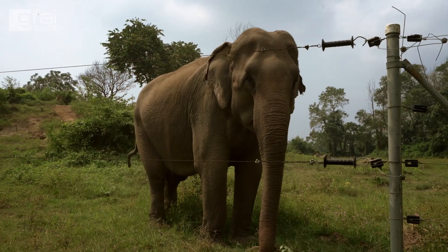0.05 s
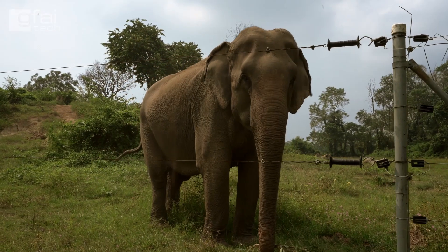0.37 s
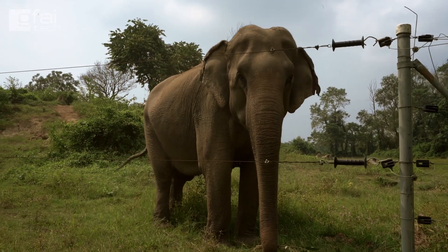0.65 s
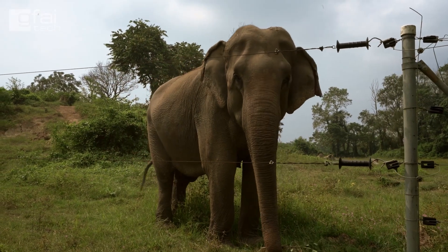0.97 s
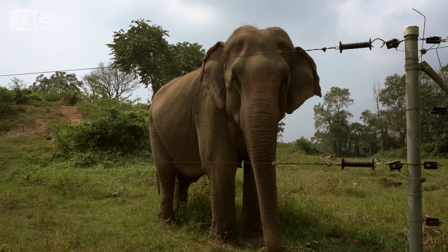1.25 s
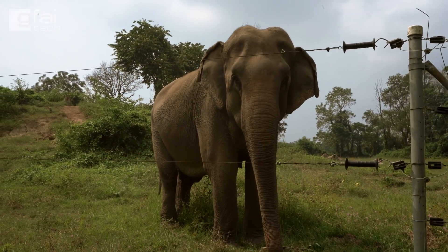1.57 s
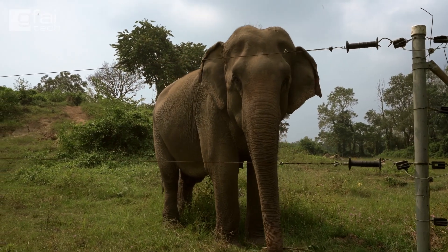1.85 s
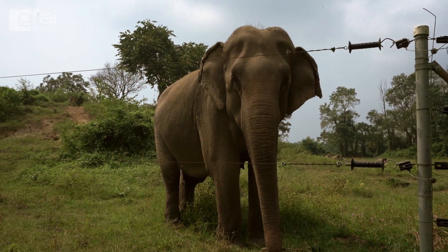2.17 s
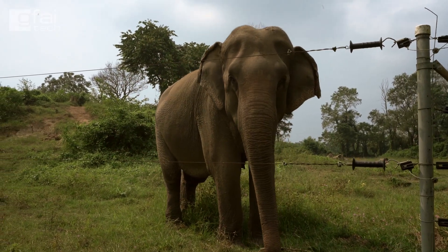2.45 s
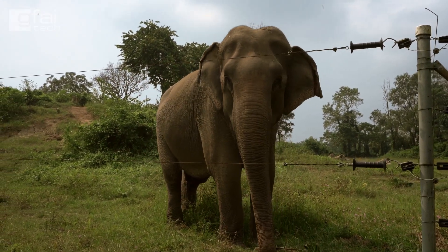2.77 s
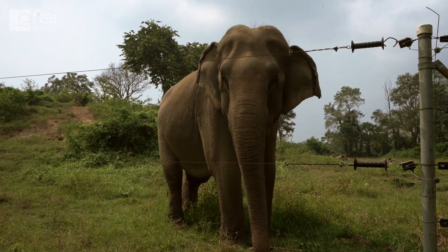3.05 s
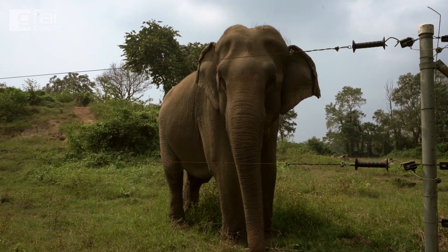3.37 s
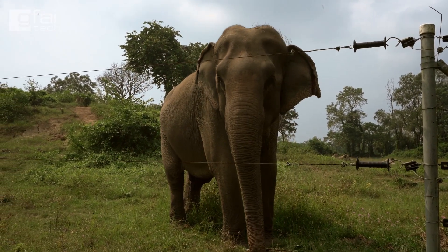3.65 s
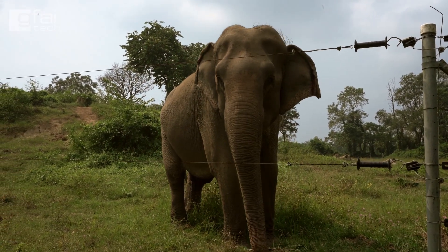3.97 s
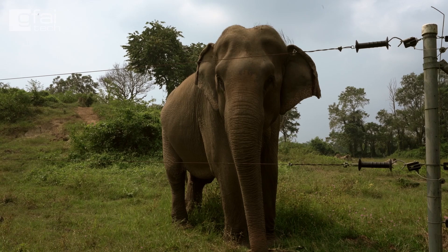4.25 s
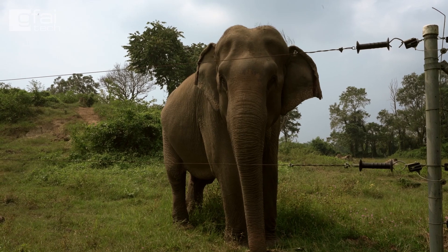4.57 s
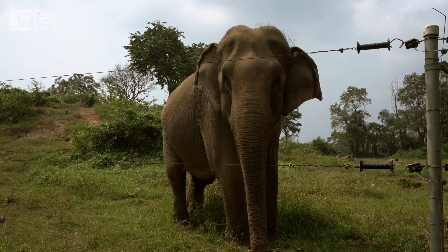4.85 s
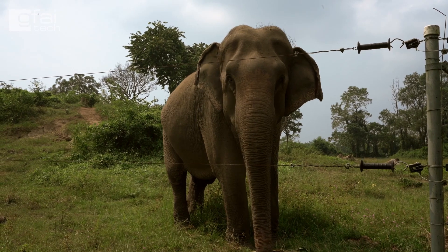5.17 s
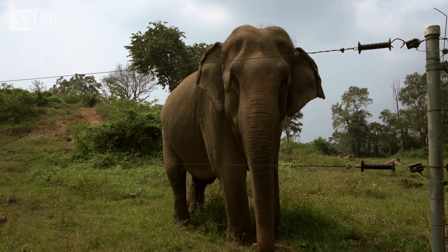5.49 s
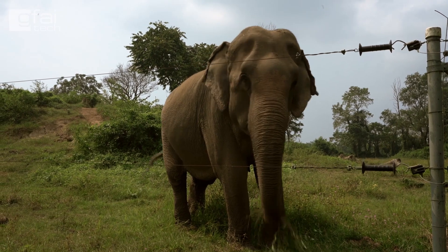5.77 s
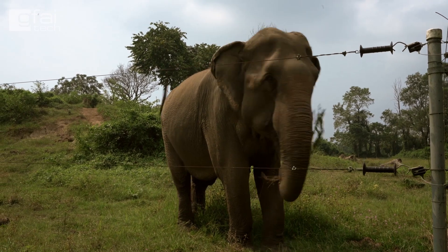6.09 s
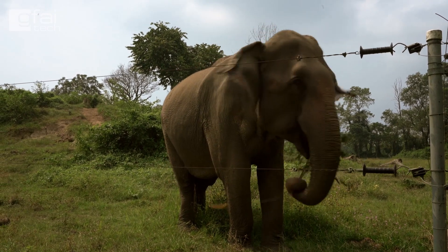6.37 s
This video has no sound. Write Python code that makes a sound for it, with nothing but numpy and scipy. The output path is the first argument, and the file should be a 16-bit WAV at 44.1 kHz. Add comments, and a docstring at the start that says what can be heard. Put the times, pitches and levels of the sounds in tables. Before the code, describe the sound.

A close elephant breaks into a deep, pulsing, raspy rumble after several seconds of gusty wind and soft chirping in a meadow.

```python
"""Wind buffets the microphone in an open meadow, where insects sing, small birds chirp and stalks tick.
Near the end, an elephant close by starts a loud, throbbing rumble: slow vocal-fold pulses
ring its long throat and trunk, and a rasping puff of air follows each pulse.
A steady, crackly hiss and rustle is heard during the call."""
import sys
import numpy as np
from scipy import signal
from scipy.fft import rfft, irfft, next_fast_len
from scipy.io import wavfile
from scipy.ndimage import uniform_filter1d

SR = 44100
rng = np.random.default_rng(int(sys.argv[2]) if len(sys.argv) > 2 else 0)


def put_to_file(sound):
    """Save the sound as 16-bit audio at rate SR, in the file named by the first command-line argument."""
    columns = np.atleast_2d(sound).T  # one column per channel
    safe = np.clip(columns, -1, 1)
    whole_steps = np.round(safe * 32767)
    wavfile.write(sys.argv[1], SR, whole_steps.astype(np.int16))


N = 291942
TIME = np.arange(N) / SR


def from_db(db):
    """Decibels to gain."""
    return 10 ** (np.asarray(db) / 20)


def rms_one(x):
    """Scale to unit power."""
    return x / np.sqrt(np.mean(x ** 2) + 1e-20)


def automation(rows):
    """One curve per column, drawn through breakpoints whose first column is time."""
    times, *columns = np.transpose(rows)
    return [np.interp(TIME, times, column) for column in columns]


def at_hz(points, hz):
    """Read a curve on a log-frequency axis."""
    freqs, values = np.transpose(points)
    return np.interp(np.log(hz), np.log(freqs), values)


def swells(rows, steepness=1):
    """Power of rounded swells (peak s, dB, length s) that rise steepness times faster than they fall."""
    power = np.zeros(N)
    for peak, db, length in rows:
        near = slice(*np.searchsorted(TIME, [peak - 2 * length, peak + 2 * length]))
        offset = 2 * (TIME[near] - peak) / length
        power[near] += from_db(db) ** 2 * np.exp(-np.where(offset < 0, steepness * offset, offset) ** 2)
    return power


def drift(rate):
    """Random modulation that glides to a new value rate times a second."""
    knots = rng.standard_normal(N // 20)
    return np.interp(TIME * rate, np.arange(len(knots)), knots)


def ring(clicks, hz, t60):
    """A unit click sets a sine of height 1 ringing."""
    r, w = from_db(-60 / (t60 * SR)), 2 * np.pi * hz / SR
    return signal.lfilter([0, np.sin(w)], [1, -2 * r * np.cos(w), r * r], clicks + 1e-18)


def noise_band(hz, width_hz, passes=1, shape=(2, N)):
    """White noise sent through a resonance one or more times; rms 1."""
    r, w = np.exp(-np.pi * width_hz / SR), 2 * np.pi * hz / SR
    band = rng.standard_normal(shape)
    for _ in range(passes):
        band = signal.lfilter([1, 0, -1], [1, -2 * r * np.cos(w), r * r], band)
    return rms_one(band)


# Outdoor stereo image, wider towards the top. Each row: frequency in Hz, left-right correlation.
OUTDOOR_LIKENESS = [(130, 1), (300, 0.45), (3100, 0.39), (15000, 0.08)]

def noise(spectrum, likeness=OUTDOOR_LIKENESS, patchy_db=0):
    """Stereo noise in half-octave bands that follow a spectrum and may each swell on their own; rms 1."""
    low, high = spectrum[0][0], min(spectrum[-1][0], SR * .4)
    edges = np.geomspace(low, high, int(2 * np.log2(high / low)) + 2)
    out, white = 0, rng.standard_normal((2, 2, N))
    for k, band in enumerate(zip(edges, edges[1:])):
        mid, side = signal.sosfilt(signal.butter(2, band, "band", fs=SR, output="sos"), white[k % 2])
        hz = np.sqrt(band[0] * band[1])
        alike = np.clip(at_hz(likeness, hz), -1, 1)
        gain = from_db(at_hz(spectrum, hz) + (patchy_db * drift(35) if patchy_db else 0))
        out = out + gain * (np.sqrt(1 + alike) * mid + np.sqrt(1 - alike) * side * [[1], [-1]])
    return rms_one(out)


def pan(x, left_db):
    """Make the left side louder than the right by left_db."""
    return x * from_db([[left_db / 2], [-left_db / 2]])


def lag_right(left, right, lag_s=0.00077):
    """Sound comes a little later on the right side."""
    return np.array([left, np.interp(TIME - lag_s, TIME, right)])


def scatter(x, t60):
    """Bushes and trees return a thin, dying cloud of echoes, different on each side."""
    age = TIME[:SR]
    echoes = rng.standard_normal((2, SR)) * from_db(-60 * age / t60) * (1 - np.exp(-age / 0.0015))
    return signal.fftconvolve(x[None], echoes / np.sqrt(np.sum(echoes ** 2) / 2), axes=1)[:, :N]


# Tone of the hush. Each row: frequency in Hz, relative level in dB.
HUSH_SPECTRUM = [(60, 11.5), (300, 4.5), (1500, 0.5), (2600, -1.5), (4000, -3), (6500, -2.5), (12000, -6),
                 (15500, -7)]
# Its fader ride. Each row: time in seconds, relative level in dB.
HUSH_RIDE = [(0.0, -57), (3.3, -51), (5.5, -52.5)]

def meadow_hush():
    """A soft, wide bed of noise under everything."""
    ride_db, = automation(HUSH_RIDE)
    return pan(from_db(ride_db + 1.5) * lag_right(*noise(HUSH_SPECTRUM), lag_s=0.00015), -1.84)


# The trill's carrier and wing-beat side tones. Each row: frequency in Hz, relative level in dB.
CRICKET_TONES = [(4880, -1.5), (5010, 1.5), (5150, -0.5), (5290, -1), (5432, 0)]
# The trill's fader ride. Each row: time in seconds, level in dB.
CRICKET_RIDE = [(0, -66.5), (3.7, -56), (4.6, -59.5), (5.5, -55.5)]
# Grasshopper phrases. Each row: start in seconds, length in seconds, centre in Hz, level in dB.
GRASSHOPPER_PHRASES = [(0.514, 0.35, 10360, -64), (1.35, 0.56, 10660, -67.5), (3.048, 0.476, 10760, -59.5),
                       (4.35, 0.54, 10990, -62)]

def insects(wing_hz=140):
    """Far crickets trill, bush crickets sizzle on the left, grasshoppers swell and stop on the right."""
    trill_db, = automation(CRICKET_RIDE)
    trill = rms_one(sum(from_db(db) * noise_band(hz, width_hz=14) for hz, db in CRICKET_TONES))
    sizzle = from_db(-63) * noise_band(15300, width_hz=1300)
    out = from_db(trill_db) * trill + pan(sizzle, 2.5)
    strokes = 1 + 0.55 * np.sin(2 * np.pi * wing_hz * TIME)
    for start, length, hz, db in GRASSHOPPER_PHRASES:
        progress = (TIME - start) / length
        swell = np.clip(2 * progress, 0, 1) * (progress < 1)
        out += from_db(db) * swell * strokes * pan(noise_band(hz, width_hz=750, passes=2), -6.5)
    return out


# A hoarse call. Each row: peak time in seconds, level in dB, length in seconds.
FAR_BIRD_CALLS = [(3.18, -50, 0.069)]

def far_bird():
    """A distant bird's hoarse call arrives as a soft blur."""
    return np.sqrt(swells(FAR_BIRD_CALLS)) * noise_band(1760, width_hz=670, passes=2)


# The notes of each named song. Each row: delay in seconds, length in seconds, loudest moment as a
# share of the length, then evenly spaced pitches as ratios to the bird's pitch.
SONG_NOTES = {"sweep": [(0, 0.072, 1, 0.82, 0.89, 0.94, 0.94, 1.13, 0.69)],
              "slur": [(0, 0.095, 0.42, 1.27, 0.96, 0.8)], "rise": [(0, 0.055, 0.55, 1, 1, 1.2)],
              "two notes": [(0, 0.104, 0.41, 0.903, 1, 0.93), (0.12, 0.045, 0.52, 1.5, 0.97, 0.92)],
              "peep": [(0, 0.038, 0.54, 0.98, 0.99)],
              "flourish": [(0.0036, 0.028, 0.15, 0.98, 0.97, 0.83, 0.75, 0.7),
              (0.028, 0.041, 0.69, 0.7, 0.86, 1.03, 0.99, 1.05, 0.99, 0.97)]}
# Small birds' cues. Each row: start in seconds, song name, pitch in Hz, level in dB.
BIRD_CUES = [(0.137, "slur", 3280, -52), (0.96, "two notes", 2790, -61), (1.39, "sweep", 7700, -57),
             (1.66, "peep", 6600, -55), (2.143, "rise", 3270, -52.5), (2.41, "slur", 3410, -47),
             (2.498, "sweep", 7700, -54), (3.434, "two notes", 2874, -49), (3.775, "sweep", 7800, -58),
             (4.145, "peep", 2554, -50.5), (4.148, "peep", 6200, -51), (4.187, "flourish", 6380, -38.5),
             (4.275, "slur", 3375, -44), (4.918, "two notes", 2930, -55), (5.3, "sweep", 7750, -53.5)]

def birds(waver=0.0053, echo_db=-4):
    """Wavering whistles glide through their pitches, reach the left side first and echo off trees."""
    song, wobble = np.zeros(N), drift(900)
    for start, name, pitch_hz, db in BIRD_CUES:
        for delay, length, loudest, *glide in SONG_NOTES[name]:
            on = (TIME >= start + delay) & (TIME < start + delay + length)
            progress = (TIME[on] - start - delay) / length
            ratio = np.interp(progress, np.linspace(0, 1, len(glide)), glide)
            hz = pitch_hz * ratio * (1 + waver * wobble[on])
            swell = np.sin(np.interp(progress, [0, loudest, 1], [0, np.pi / 2, np.pi])) ** 1.53
            song[on] += from_db(db) * np.sqrt(2) * swell * np.sin(2 * np.pi * np.cumsum(hz) / SR)
    direct = lag_right(song, song, lag_s=0.00013)
    return pan(direct, -3.2) + from_db(echo_db) * scatter(song, t60=0.35)


# Dry stalks. Each row: start in seconds, level in dB, centre in Hz, width as a multiple of the centre.
STALK_SNAPS = [(0.47, -46, 4350, 0.35), (0.802, -46, 1450, 0.7), (1.846, -33, 6600, 1.7),
               (2.486, -39.5, 1630, 0.55), (4.71, -36, 5870, 1.9), (4.71, -38, 1400, 1.9),
               (6.163, -31.5, 4140, 1.5), (6.195, -33.5, 6000, 1.4)]
# Rustling blades. Each row: peak time in seconds, level in dB, length in seconds.
BLADE_RUSTLES = [(1.89, -51.5, 0.07), (2.19, -54, 0.084), (2.44, -52, 0.089), (3.97, -55.5, 0.083),
                 (6.197, -35, 0.021)]
# Tone of the blades. Each row: frequency in Hz, relative level in dB.
BLADE_SPECTRUM = [(1000, -15), (7000, -3), (16000, -16)]

def grass(snap_decay_s=0.0026):
    """Stalks snap with a short, broad crack and a quick echo; blades rustle."""
    snaps = np.zeros(N)
    for start, db, hz, breadth in STALK_SNAPS:
        age = np.maximum(TIME - start, 0)
        crack = noise_band(hz, hz * breadth, passes=2, shape=N)
        snaps += from_db(db) * crack * (age > 0) * np.exp(-np.minimum(age / snap_decay_s, 30))
    echoes = from_db(-1.5) * scatter(snaps, t60=0.14)
    rustle = np.sqrt(swells(BLADE_RUSTLES)) * noise(BLADE_SPECTRUM)
    return pan(snaps, -2.5) + echoes + pan(rustle, 2.3)


# Gusts. Each row: start in seconds, length in seconds, level in dB.
WIND_GUSTS = [(0.0, 0.61, -45.5), (1.667, 0.29, -53.5), (2.796, 0.38, -37.5), (3.691, 0.37, -38),
              (4.436, 0.44, -47)]

def gust_power(breeze_db=-56, attack_s=0.02, release_s=0.091):
    """Each gust rises quickly, holds and dies away over a light breeze."""
    power = from_db(breeze_db) ** 2
    for start, length, db in WIND_GUSTS:
        rise = np.clip((TIME - start) / attack_s, 0, 1)
        fall = np.exp(-np.clip((TIME - start - length) / release_s, 0, 30))
        power = power + (from_db(db) * rise * fall) ** 2
    return power


# The hardest eddies land as single thumps. Each row: peak time in seconds, level in dB.
WIND_BUFFETS = [(0.013, -32), (0.047, -31), (0.344, -33.5), (0.417, -27), (0.472, -29.5), (0.782, -33),
                (0.824, -27.5), (0.929, -28), (1.027, -36.5), (1.841, -41), (2.808, -34), (2.891, -31),
                (2.979, -29.5), (3.087, -25), (3.133, -25.5), (3.205, -31.5), (3.306, -33), (3.371, -33.5),
                (3.653, -31.5), (3.887, -27.5), (3.927, -32), (3.977, -28.5), (4.019, -19), (4.044, -23.5),
                (4.154, -33.5), (4.196, -31.5), (4.822, -35), (4.88, -36.5), (5.324, -36)]
# The wind's low end. Each row: frequency in Hz, relative level in dB.
WIND_SPECTRUM = [(26, -3.5), (40, -0.5), (60, 3.5), (90, 2.5), (130, -4), (200, -23), (300, -45)]

def wind(buffet_s=0.019, even_s=0.027, lumpy_db=2.5):
    """Lumpy eddies thump on the microphone, left side first; the harder ones also flutter higher up."""
    blowing = gust_power() * from_db(lumpy_db * drift(28)) ** 2
    strength = np.sqrt(blowing + swells([(peak, db, buffet_s) for peak, db in WIND_BUFFETS]))
    eddies = noise(WIND_SPECTRUM, likeness=[(100, 0.97)])
    # level the noise so that gusts and buffets set the dynamics
    eddies /= np.sqrt(uniform_filter1d(np.mean(eddies ** 2, axis=0), int(even_s * SR)))
    flutter = noise([(150, 17), (280, 1.5), (450, -8)], likeness=[(100, 0.16)])
    pressure = strength * eddies + from_db(4) * strength ** 1.576 * flutter
    return lag_right(*signal.sosfilt(signal.butter(4, 430, fs=SR, output="sos"), pressure))


CALL_START_S = 5.667
CALL_AGE = np.maximum(TIME - CALL_START_S, 0)

def call_build(build_s=0.41):
    """A fade-in gain and a level in dB that builds up as the call goes on."""
    fade_in = np.clip((TIME - CALL_START_S + 0.068) / 0.29, 0, 1)
    return fade_in, -26.5 - 33.5 * np.exp(-CALL_AGE / build_s)


# Tone of the crackly rustle during the call. Each row: frequency in Hz, relative level in dB.
CRACKLE_SPECTRUM = [(150, 18), (330, 16), (700, -1), (6500, -3), (8200, -8), (9700, -6.5), (12000, -7.5),
                    (16000, -10)]

def crackly_rustle(grains_per_s=900, grain_db=2.5):
    """A steady, crackly hiss and rustle during the call."""
    fade_in, build_db = call_build()
    gain = fade_in * from_db(0.15 * build_db - 32.5 + grain_db * drift(grains_per_s))
    return pan(gain * noise(CRACKLE_SPECTRUM, likeness=[(1000, 0.53), (15000, 0.069)], patchy_db=3), -5)


def fold_cycles(start_hz=9.71, settled_hz=15.56, settle_s=0.1023, creep_hz_per_s=5.14):
    """Vocal-fold cycles since the call began: the folds start slowly, settle, then creep faster."""
    rate = settled_hz - (settled_hz - start_hz) * np.exp(-CALL_AGE / settle_s) + creep_hz_per_s * CALL_AGE
    cycles = np.cumsum(rate) / SR
    return cycles - np.interp(CALL_START_S, TIME, cycles)


def fold_pulses():
    """A unit click at each closing of the folds."""
    return np.diff(np.floor(np.maximum(fold_cycles(), -.5)), prepend=-1)


def bursts(resonances, level_db, delay_s, shimmer_db, bend_hz, steepness, jitter_s=0, waver=0, stretch=1):
    """Resonances swell around each pulse; soft tissue varies their pitch, timing and strength."""
    out, closings = np.zeros(N), np.flatnonzero(fold_pulses() > 0)
    for hz, length, db in resonances:
        chance = rng.standard_normal((len(closings), 2))
        rows = [(i / SR + delay_s + jitter_s * abs(late), level_db[i] + db + shimmer_db * stress, length)
                for i, (late, stress) in zip(closings, chance)]
        bend = waver * hz * drift(30) + bend_hz * drift(200)
        out += np.sqrt(swells(rows, steepness)) * np.sin(2 * np.pi * np.cumsum(hz * stretch + bend) / SR)
    return out


def airway(x, lowest_hz=162.3, echo=0.46):
    """A long pipe echoes with its sign flipped, stressing odd multiples of its lowest resonance."""
    size = next_fast_len(N + SR)
    round_trip = np.exp(-1j * np.pi * np.arange(size // 2 + 1) * SR / size / lowest_hz)
    return irfft(rfft(x, size) / (1 + echo * round_trip), size)[:, :N]


# Trunk resonances. Each row: frequency in Hz, burst length in seconds, relative level in dB.
TRUNK_RESONANCES = [(460, 0.054, 3.5), (806, 0.024, -7), (1125, 0.031, -6), (1604, 0.022, -10),
                    (1805, 0.027, -2.5), (2760, 0.026, -5), (4930, 0.022, -13)]

def elephant_breath(throb_db=6, rasp_db=4, dulling=0.21, pivot_hz=1000):
    """Turbulent air follows each pulse: it rasps in the trunk and puffs at the opening."""
    fade_in, air_db = call_build()
    effort_db = air_db - air_db.max()  # 0 at the height of the call
    cycles = fold_cycles()

    def throb(db, lag_cycles):
        """The airflow surges a little after each pulse."""
        return fade_in * from_db(air_db + db + throb_db * np.cos(2 * np.pi * (cycles - lag_cycles)))

    # weak airflow leaves the resonances above the pivot dull
    trunk = sum(bursts([(hz, length, db)], air_db + dulling * np.log(hz / pivot_hz) * effort_db,
                       delay_s=0.005, shimmer_db=3, bend_hz=35.96, steepness=0.99,
                       jitter_s=0.0042, waver=0.022)
                for hz, length, db in TRUNK_RESONANCES)
    trunk *= from_db(rasp_db * drift(260))
    # harder blowing breaks into a roar that fills the airway
    roar_gain = throb(-9, lag_cycles=0.16) * from_db(effort_db + rasp_db * drift(300))
    roar_spectrum = [(300, 9), (450, 14), (900, 15.5), (1400, 2), (3300, 8.5), (4800, -3)]
    roar = airway(roar_gain * noise(roar_spectrum, likeness=[(1000, 0.52)], patchy_db=3))
    jet = noise_band(5730, width_hz=3700, passes=2)
    spray = rms_one(airway(jet + jet.mean(axis=0))) * from_db(rasp_db * drift(300))
    puffs = throb(-14, lag_cycles=0.28) * spray
    # a faint flutter in the throat comes just before the first pulse
    flutter = np.sqrt(swells([(5.585, -43, 0.071)])) * noise_band(435, width_hz=93, shape=N)
    return pan(trunk + roar + flutter, -4) + pan(puffs, -5)


# Deep modes of the throat and trunk, then the throat's higher ones.
# Each row: frequency in Hz, relative level in dB, seconds to fall by 60 dB.
DEEP_MODES = [(110.2, 6, 0.34), (79, -31, 0.017), (36.7, -45, 0.082)]
HIGH_MODES = [(288, -11, 0.1), (523.6, -13.5, 0.18), (1118, -26.5, 0.21)]
# Mouth resonances. Each row: nominal frequency in Hz, burst length in seconds, relative level in dB.
MOUTH_RESONANCES = [(497, 0.017, 0), (806, 0.026, -20.5)]
# The mouth's movement. Each row: time in seconds, level in dB, lower resonance in Hz.
MOUTH_RIDE = [(5.67, -24.5, 501.7), (5.82, -22.5, 505), (5.89, -14.5, 501.4), (5.95, -13.5, 495),
              (6.005, -17, 470.5), (6.12, -23.5, 505.5), (6.175, -13.5, 463.8), (6.23, -19, 491),
              (6.285, -30, 459.3), (6.34, -18, 479), (6.39, -16, 488), (6.54, -16.5, 473.6),
              (6.59, -10, 481.4)]
# A brief low grunt. Each row: peak time in seconds, level in dB, length in seconds.
GRUNTS = [(6.29, -26, 0.022)]

def elephant_rumble(rise_db=15, attack_s=0.22, lead_s=0.0019, soft_hz=132, grunt_hz=209):
    """Each pulse of the vocal folds rings the deep modes and swells in the mouth resonances."""
    drive_db = -16 - rise_db * np.maximum(1 - CALL_AGE / attack_s, 0)
    pulses = fold_pulses() * from_db(drive_db)
    # the flow swells softly just before the folds snap shut
    early = np.interp(TIME + lead_s, TIME, pulses)
    push = signal.sosfilt(signal.butter(3, soft_hz, fs=SR, output="sos"), early)
    boom = sum(from_db(db) * ring(push, hz, t60) for hz, db, t60 in DEEP_MODES)
    overtones = sum(from_db(db) * ring(pulses, hz, t60) for hz, db, t60 in HIGH_MODES)
    mouth_db, mouth_hz = automation(MOUTH_RIDE)
    mouth = bursts(MOUTH_RESONANCES, mouth_db, delay_s=0.0051, shimmer_db=2, bend_hz=16.1,
                   steepness=2.9, stretch=mouth_hz / MOUTH_RESONANCES[0][0])
    grunt = np.sqrt(swells(GRUNTS)) * np.sin(2 * np.pi * grunt_hz * TIME)
    return pan(lag_right(boom, boom), -.5) + pan(overtones + mouth + grunt, -3.1)


def scene():
    """The elephant, the meadow around it and the wind at the microphone."""
    bed = meadow_hush()
    elephant = elephant_rumble() + elephant_breath()
    return bed + elephant + crackly_rustle() + wind() + birds() + far_bird() + insects() + grass()


def record(dry):
    """The microphone loses the deepest bass, and the top is cut steeply."""
    thinned = signal.sosfilt(signal.butter(2, 24, "high", fs=SR, output="sos"), dry)
    return signal.sosfilt(signal.ellip(10, .1, 80, 15830, fs=SR, output="sos"), thinned)


dry = scene()
out = record(dry)
put_to_file(out)
```